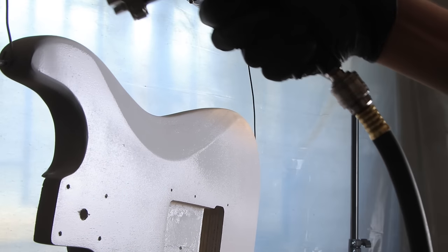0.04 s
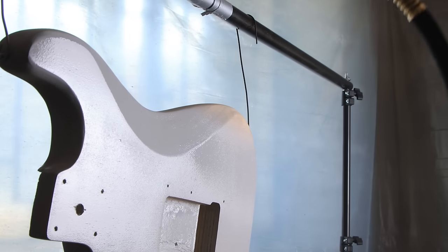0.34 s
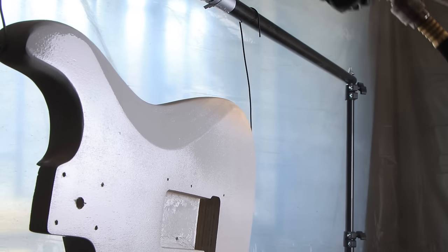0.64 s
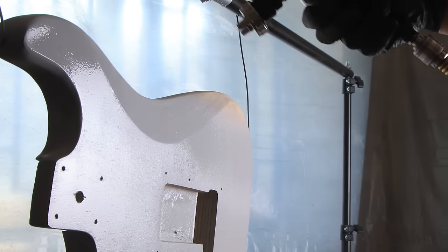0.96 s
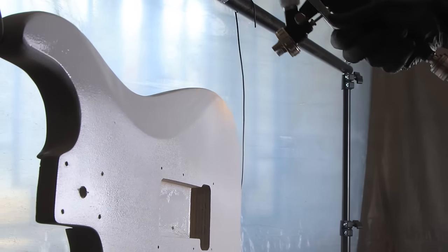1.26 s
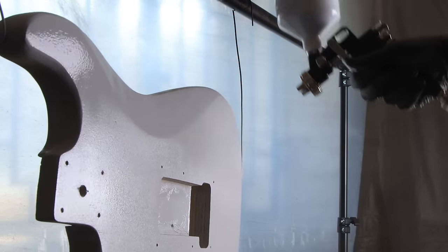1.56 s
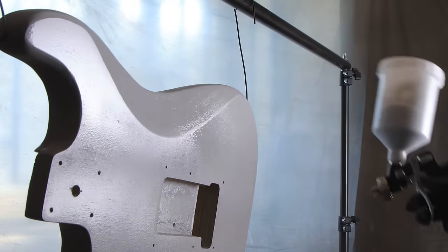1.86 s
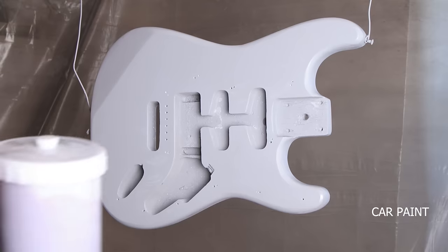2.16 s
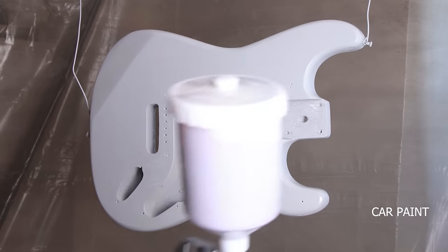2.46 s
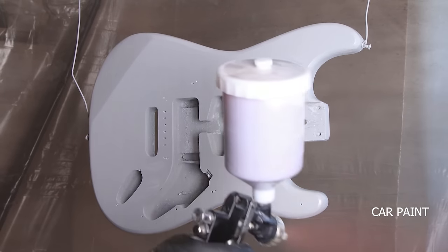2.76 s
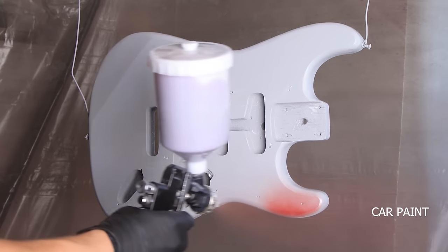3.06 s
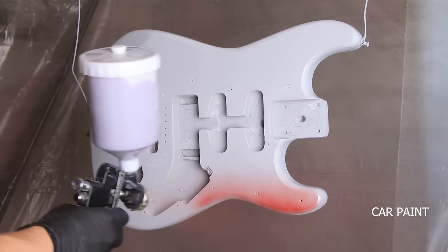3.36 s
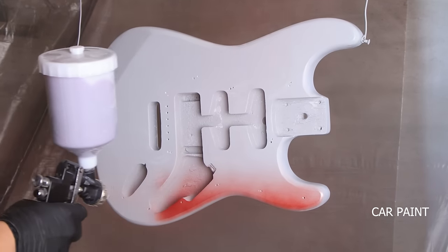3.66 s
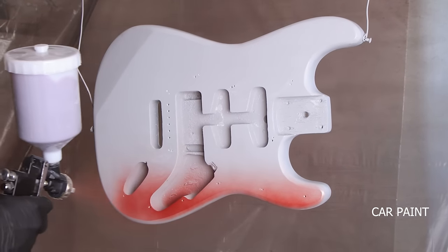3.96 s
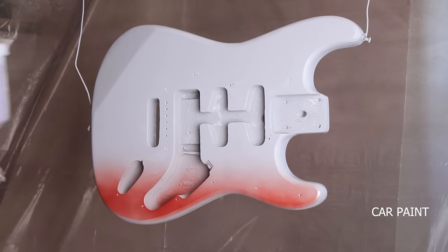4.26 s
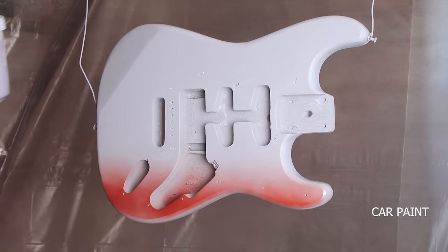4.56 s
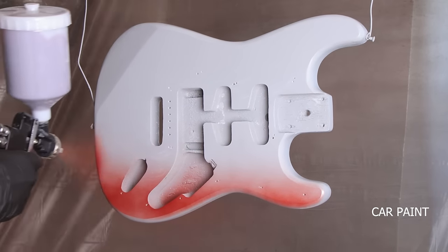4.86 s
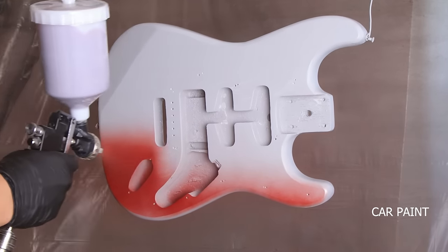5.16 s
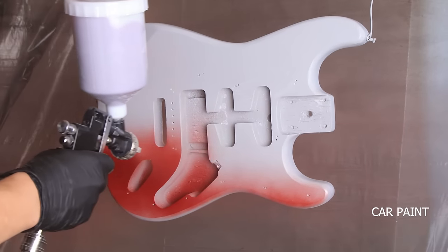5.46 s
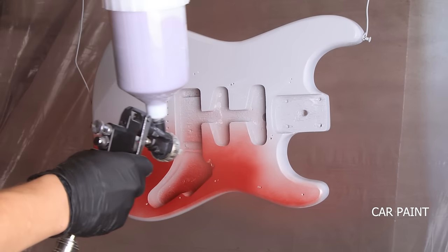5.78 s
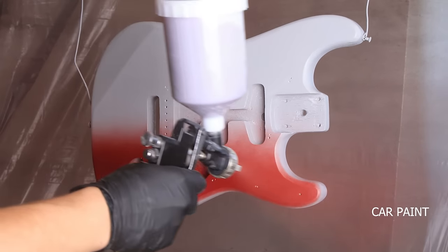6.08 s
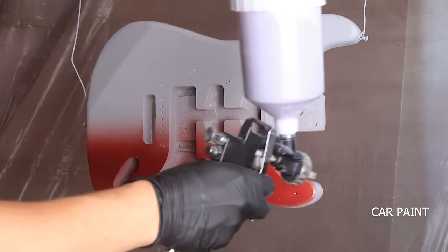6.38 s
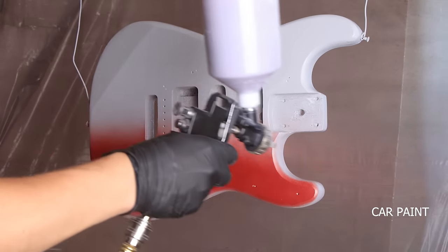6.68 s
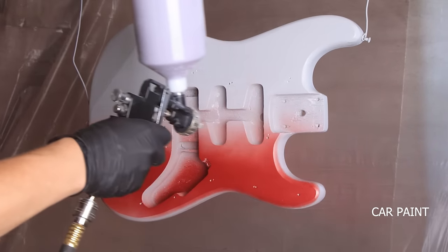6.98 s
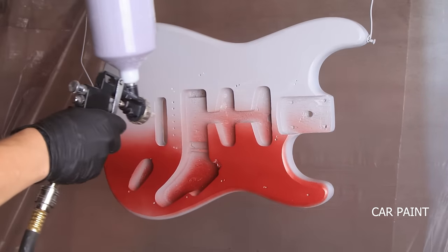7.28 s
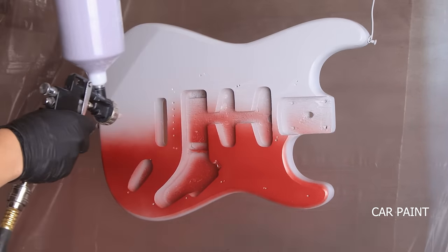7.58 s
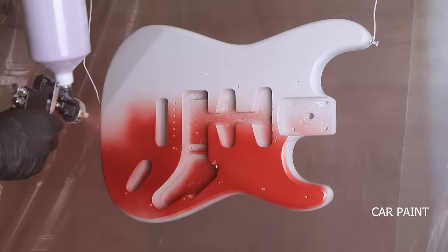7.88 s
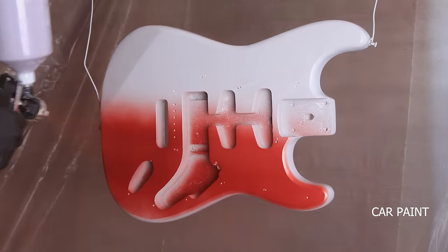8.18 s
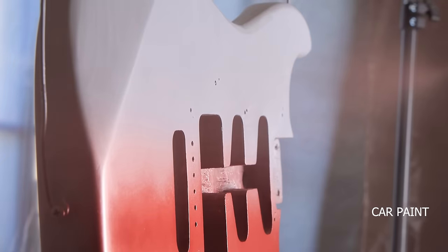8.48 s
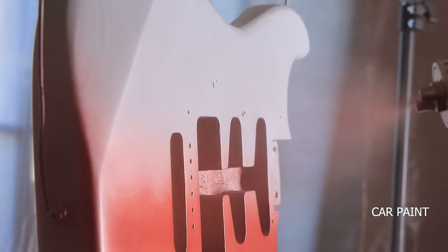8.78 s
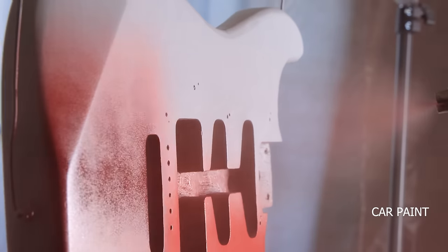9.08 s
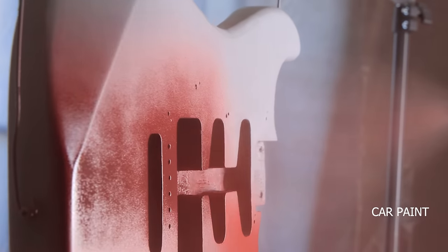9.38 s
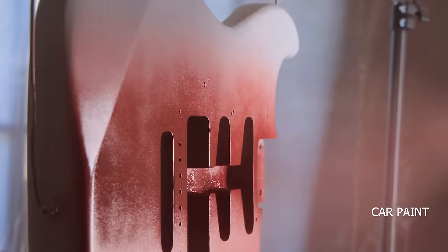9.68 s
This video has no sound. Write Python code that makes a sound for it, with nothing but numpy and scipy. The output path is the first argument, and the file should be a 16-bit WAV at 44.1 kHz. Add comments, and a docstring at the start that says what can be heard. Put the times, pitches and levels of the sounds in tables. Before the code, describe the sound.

A compressed-air spray gun paints a hanging wooden guitar body in a spray booth. A brief bright hiss with two small ticks of spat paint is followed by five longer hissing passes, each lasting one to two seconds. Under the hiss, air splashes softly on the wood and raises a weak hollow rumble. The short pauses hold only a faint air leak and extractor hum. The gun sounds close.

```python
"""A bright jet hiss starts, with two ticks of spat paint: a compressed-air spray gun coats a hanging
guitar body in six passes. The hiss is turbulent mixing noise; bursts fade fast, the fifth stops dead.
The fan of air splashes where it meets the wood, and buffets edges and cavities into a hollow rumble.
Between the passes only a faint leak of air and the spray booth's extractor remain."""
import sys
import numpy as np
from scipy import signal
from scipy.fft import irfft, next_fast_len
from scipy.io import wavfile
from scipy.ndimage import uniform_filter1d

SR = 44100
rng = np.random.default_rng(int(sys.argv[2]) if len(sys.argv) > 2 else 0)


def store_wav(level_fs):
    """Save 16-bit WAV to argv[1]."""
    pcm = np.round(np.clip(np.atleast_2d(level_fs), -1, 1) * 32767)
    wavfile.write(sys.argv[1], SR, pcm.T.astype(np.int16))


N = 438354
T = np.arange(N) / SR
SIZE, HOP = 1024, 256  # samples in a frame, and between frames
FRAME_S = np.arange(N // HOP + 5) * HOP / SR
NOW = FRAME_S[:, None]
HZ = np.fft.rfftfreq(SIZE, 1 / SR)
FINE_HZ = np.arange(0, 2000, SR / next_fast_len(N))


def amp(db):
    """Amplitude ratio of a level in decibels."""
    return 10 ** (np.asarray(db) / 20)


def spectrum(points):
    """Magnitude from levels interpolated on a logarithmic frequency axis."""
    hz, db = np.transpose(points)
    return amp(np.interp(np.log(HZ + 1), np.log(hz + 1), db))


def bell(hz, width_hz, axis=HZ):
    """Resonance curve with the given half-power bandwidth."""
    return 1 / (1 + ((axis - hz) / (.78 * width_hz)) ** 2)


def unit(shape, lo=0, hi=SR):
    """Normalises a magnitude to unit power within a band."""
    band = (HZ >= lo) & (HZ <= hi)
    return shape / np.sqrt(np.sum(shape[..., band] ** 2, -1, keepdims=True) + 1e-20)


def gaussian(shape):
    """Complex Gaussian amplitudes of random phase."""
    return rng.standard_normal((*shape, 2)).view(complex)[..., 0]


def patches(frames, bins):
    """Random fluctuation of unit variance, correlated in time and frequency."""
    z = rng.standard_normal((len(FRAME_S), len(HZ)))
    z = uniform_filter1d(uniform_filter1d(z, frames, 0), bins, 1, mode="wrap")
    return z / z.std()


def noise(magnitude):
    """Turbulence with a given short-time spectrum, by overlap-add."""
    spectra = magnitude * gaussian((len(FRAME_S), len(HZ)))
    frames = irfft(spectra, SIZE) * signal.windows.hann(SIZE, sym=False) * SIZE / np.sqrt(6)
    overlap = SIZE // HOP
    return sum(np.pad(frames[k::overlap].ravel(), (k * HOP, SIZE))[SIZE // 2:][:N]
               for k in range(overlap))


def steady(shape):
    """Stationary noise of unit rms with a finely resolved spectrum."""
    x = irfft(gaussian(FINE_HZ.shape) * shape, next_fast_len(N))[:N]
    return x / x.std()


def swell(on_s, hold_s, db, rise_db_per_s, fall_db_per_s):
    """Power of a stream of air that grows, holds and decays exponentially within its pass."""
    rise_db = rise_db_per_s * np.maximum(on_s - NOW, 0)
    fall_db = fall_db_per_s * np.maximum(NOW - on_s - hold_s, 0)
    return amp(db - rise_db - fall_db) ** 2 * (pass_at(NOW) == pass_at(on_s))


def blend(powers, values):
    """Power-weighted mean: the strongest stream dominates."""
    return sum(power * value for power, value in zip(powers, values)) / sum(powers)


# Spectrum of the extractor's air: f/Hz, relative level/dB
FAN_AIR = [(20, -10), (45, -5), (80, 0), (100, -4.5), (125, 1.5), (190, -1), (350, -7.5), (560, -5.5),
           (750, -9.5), (1300, -8.5), (2000, -16), (6000, -14.5), (12000, -17.5), (14000, -32.5)]
# Extractor tones: f/Hz, bandwidth/Hz, level/dB
FAN_TONES = [(73.8, 6.9, -99), (510, 5.9, -94.5), (1457, 70, -107)]

def extractor(air_db=-87, draught_db=-101, draught_hz=90):
    """Fan noise: narrow-band tones over broadband flow, with a draught in antiphase at the two ears."""
    tones = sum(amp(db) * steady(bell(hz, width, FINE_HZ)) for hz, width, db in FAN_TONES)
    draught = amp(draught_db) * steady(bell(0, draught_hz, FINE_HZ))
    air = noise(amp(air_db) * unit(spectrum(FAN_AIR)))
    return tones + air + np.array([draught, -draught])


# Spectrum of the closed gun's hiss: f/Hz, relative level/dB
LEAK_SPECTRUM = [(600, -9.5), (2000, -9.5), (4200, -4), (5000, 3.5), (5800, -4), (6900, 3), (8500, -8),
                 (9600, -1.5), (11000, -12), (11800, 1), (12500, -4), (13200, -18), (15800, -8)]
# Leaks between passes: start t/s, end t/s, initial level/dB before gain
LEAKS = [(0.197, 0.53, -70), (1.756, 2.081, -66), (4.25, 4.56, -87), (6.23, 6.54, -88)]

def leak(gain_db=2, fall_db_per_s=54, whistle_hz=11850, whistle_width_hz=600, whistle_db=-89):
    """Orifice noise from the closed gun decays exponentially; while near, the gun whistles faintly."""
    envelope = sum(((NOW > start) & (NOW < end)) * amp(db - fall_db_per_s * abs(NOW - start))
                   for start, end, db in LEAKS)
    hiss = unit(spectrum(LEAK_SPECTRUM)) * envelope * amp(gain_db)
    near = (NOW > 3) & (NOW < 7)
    whistle = near * amp(whistle_db) * unit(bell(whistle_hz, whistle_width_hz))
    return noise(np.hypot(hiss, whistle))


# Stray puffs of air: t/s, level/dB, half-length/s, corner f/Hz
PUFFS = [(4.92, -73, 0.066, 220), (8.85, -75, 0.028, 180)]

def puffs():
    """Wind noise: the pressure fluctuation of each puff thumps softly on the microphone."""
    out = np.zeros(N)
    for s, db, half_s, corner_hz in PUFFS:
        span = abs(T - s) < 3 * half_s
        window = np.exp(-((T[span] - s) / half_s) ** 2)
        band = (FINE_HZ / (FINE_HZ + corner_hz)) ** 2 / (1 + (FINE_HZ / corner_hz) ** 4)
        wind = window * steady(band)[span]
        out[span] += amp(db) * wind * np.linalg.norm(window) / np.linalg.norm(wind)
    return out


# Drops of paint spat by the nozzle: t/s, tick gain/dB, pop gain/dB
SPITS = [(0.055, -20, -38), (.094, -17, -36.5)]

def spits(tick_hz=9000, tick_s=.00015, travel_s=.024, push_s=.00023):
    """Sound outruns flow: each spit ticks, then its air arrives as a push and a weak suction."""
    out = 0
    for s, tick_db, pop_db in SPITS:
        tick = np.exp(-((T - s) / tick_s) ** 2) * np.sin(2 * np.pi * tick_hz * (T - s))
        age = np.maximum(T - s - travel_s, 0) / push_s
        pop = age * (2 - age * .8) * np.exp(-age)
        out = out + amp(tick_db) * tick + amp(pop_db) * pop
    return out


# Spectrum of the buffeting: f/Hz, relative level/dB
RUMBLE = [(30, -32), (160, -17), (245, -5.5), (265, -3.5), (350, -1), (435, -7), (455, -8), (690, -3),
          (730, -7.5), (880, -4.5), (930, -14), (1120, -12), (1800, -36)]
# Spectrum of the dull rush of the flow: f/Hz, relative level/dB
RUSH = [(40, -6.5), (100, -5), (130, 5), (170, 5), (400, -8), (900, 4.5), (1350, 15), (1800, 1.5),
        (4000, -12)]
# Cavity resonances: f/Hz, bandwidth/Hz, relative level/dB
CAVITY_MODES = [(198, 14, -15), (345, 29, -17), (411, 14, -11.5), (579.5, 29, -13), (616, 26, -9.5),
                (866, 30, -21.5)]
# Gusts on edges and cavities: fully on t/s, hold/s, drive level/dB, rise/(dB/s), fall/(dB/s),
# favoured f/Hz, loss away from it/(dB/octave)
GUSTS = [(0.07, 0.089, -54.5, 357.5, 206, 603, 6.5), (.87, .17, -49, 31.5, 25, 260, 3.5),
         (1.416, 0.19, -55.5, 39, 96.5, 420, 0.5), (3.017, 0.17, -59.5, 350, 35, 290, 12.5),
         (3.418, .05, -60.5, 80, 23, 340, 9), (4.91, 0.093, -63.5, 199, 34, 328, 2),
         (5.242, 0.032, -65.5, 60, 80, 450, 5), (6.985, 0.092, -56, 171, 130, 260, 10),
         (7.29, 0.03, -67, 150, 110, 600, 1.5), (7.705, 0.092, -47, 133, 113, 490, 3),
         (8.025, .02, -64.5, 130, 90, 600, 2), (8.19, 0.032, -68, 120, 113, 400, 1.5),
         (9.05, .005, -61, 450, 600, 400, 11), (9.137, 0.083, -58, 280, 170, 400, 7),
         (9.6, 0.12, -75.5, 12, 34, 420, 1)]

def buffet(stream_db=-79.5, onset_db=-75, hard_db=-56, brighten=.14, flutter_db=2, patchy_db=3,
           body_db=-10.5, cavity_db=-1, rush_db=-77, rush_onset_db=-81):
    """Forced resonance: gusts on edges and cavities rumble and excite hollow modes above a dull rush."""
    powers = [swell(*row[:5]) + 1e-20 for row in GUSTS]
    level_db = 10 * np.log10(sum(powers) + amp(stream_db) ** 2)
    favoured_hz, loss_db = (blend(powers, column) for column in np.transpose(GUSTS)[5:])
    # a weak stream only rushes; a strong one breaks into gusts
    gusts_db = flutter_db * patches(frames=5, bins=200)[:, :1]
    force = amp(level_db + gusts_db) / np.sqrt(1 + amp(onset_db - level_db) ** 4)
    flow = amp(rush_db) / np.sqrt(1 + amp(rush_onset_db - level_db) ** 2)

    def shedding(hz):
        """Vortex shedding favours one eddy size; harder gusts carry smaller eddies, which sound higher."""
        octaves_away = np.minimum(abs(np.log2((hz + 1) / favoured_hz)), 1.5)
        tilt_db = brighten * (level_db - hard_db) * np.log2(np.clip(hz / 400, .6, 2.5))
        return force * amp(tilt_db - loss_db * octaves_away)

    body = unit(spectrum(RUMBLE), 150, 750) * shedding(HZ)
    air = np.hypot(amp(body_db) * body, flow * unit(spectrum(RUSH)))
    ring = 0
    for hz, width, db in CAVITY_MODES:
        drive = np.interp(T, FRAME_S, shedding(hz)[:, 0])
        ring = ring + amp(db + cavity_db) * steady(bell(hz, width, FINE_HZ)) * drive
    flicker = amp(patchy_db * patches(frames=14, bins=3))
    return (noise(air * flicker) + ring) * bursts(lag_s=.0018, lead_s=.002)


# Spectrum of the air sheet on the wood: f/Hz, relative level/dB
SPLASH_SPECTRUM = [(1000, -4), (1500, -0.5), (1750, -1), (1900, 2.5), (2150, 4), (2400, -3), (3200, -12)]
# Sweeps of the fan of air onto the wood: fully on t/s, hold/s, level/dB, rise/(dB/s), fall/(dB/s),
# lower cutoff f/Hz when fully on
SWEEPS = [(.07, 0.1, -53.5, 112, 199, 1040), (.76, 0.74, -58, 42, 22, 1095),
          (2.477, 0.037, -61.5, 200, 121, 1150), (2.6, 0.38, -63, 30, 15, 1480),
          (2.72, 0.034, -58.5, 89, 80, 1120), (3.4, .15, -65, 15, 15, 1420),
          (4.79, 0.15, -62.5, 60, 27, 1110), (6.62, .04, -68, 100, 130, 1750),
          (7.1, 0.59, -67, 13, 11, 1340), (8.478, 0.055, -60.5, 46, 33, 1360),
          (8.946, 0.22, -63, 4, 22, 1280), (9.68, .05, -67, 30, 36, 1750)]

def splash(rim_db=-73.5, rim_cutoff_hz=1800, drop_hz_per_db=30, patchy_db=3):
    """A midrange splash of air, high-pass filtered: its steep low edge drops as it gets louder."""
    powers = [swell(*row[:5]) for row in SWEEPS]
    cutoffs = [hz + drop_hz_per_db * (db - 10 * np.log10(power + 1e-20))
               for power, (_, _, db, _, _, hz) in zip(powers, SWEEPS)]
    rim_power = np.full_like(NOW, amp(rim_db) ** 2)  # the rim of the fan always touches the wood
    level_db = 10 * np.log10(np.max(powers, 0) + rim_power)
    cutoff_hz = blend(np.square(powers + [rim_power]), cutoffs + [rim_cutoff_hz])
    high_pass = 1 / np.sqrt(1 + (np.clip(cutoff_hz, 1000, 1850) / (HZ + 1)) ** 40)
    shape = unit(spectrum(SPLASH_SPECTRUM) * high_pass, 1200, 2100)
    flicker_db = patchy_db * patches(frames=14, bins=3)
    return noise(shape * amp(level_db + flicker_db)) * bursts(lag_s=.0041, lead_s=.01)


# Bursts of spray, the fifth ending abruptly: start t/s, stop t/s, fade rate/(dB/s), pressure surge/dB,
# hiss level/dB before gain, roar level/dB
PASSES = [(-.05, 0.188, 364.5, 1.5, -31, -43), (0.52, 1.743, 349, 1, -29.6, -42.5),
          (2.423, 4.24, 380, 3.9, -31, -44), (4.563, 6.227, 377.5, 3.8, -32, -43.5),
          (6.54, 8.284, 9002, 3.5, -32, -43.9), (8.35, 9.851, 361, 10, -34.5, -43.5)]

def bursts(lag_s=0, lead_s=0, rise_s=.037):
    """Smooth rise, exponential decay; the lower bands start slightly later and fade sooner than the hiss."""
    t, envelope = T[::32], 0
    for start, stop, fade_db_per_s, *_ in PASSES:
        rise = np.sin(np.pi / 2 * np.clip((t - start - lag_s) / rise_s, 0, 1)) ** 3
        envelope = envelope + rise * amp(-fade_db_per_s * np.maximum(t - stop + lead_s, 0))
    return np.interp(T, t, envelope)


def pass_at(s):
    """Index of the latest burst of spray, looking two frames ahead."""
    starts = [row[0] for row in PASSES]
    return np.maximum(np.searchsorted(starts, s + 2 * HOP / SR) - 1, 0)


# Spectrum of fine turbulence at the air cap: f/Hz, relative level/dB
HISS = [(2500, -43), (4500, -17.5), (6000, -7.5), (7000, -1), (7800, -1), (8600, -4.5), (9900, 0),
        (11000, 0), (11750, 1.1), (12300, 1.1), (13150, -3), (14300, 0), (15400, 3), (16000, 0)]
# Spectrum of larger eddies mixing with still air: f/Hz, relative level/dB
ROAR = [(1700, -39.5), (2120, -28.5), (2290, -8.5), (2900, -5.5), (3700, -1), (4900, 2.56), (5700, 2),
        (7000, 1), (10000, -27)]
# Bands that swell or dip as the gun swings: t/s, half-length/s, f/Hz, bandwidth/Hz, gain/dB
SWINGS = [(.08, 0.074, 7050, 1090, 3.5), (.6, .1, 6500, 2500, -2), (0.883, 0.17, 7200, 1100, 5),
          (0.86, .1, 15000, 3000, -2), (1.185, 0.12, 10500, 7000, 3), (1.5, .18, 6820, 1196, 6),
          (2.6, 0.33, 5060, 2500, 2), (3.6, .5, 7100, 1500, -1.5), (5.598, 0.38, 2600, 800, 2),
          (7.38, 0.16, 6240, 1500, 2), (8.15, 0.14, 3520, 2000, -2), (9.25, 0.42, 2400, 600, 4),
          (9.87, 0.067, 12000, 6000, 3.5)]

def jet(hiss_gain_db=-2, dip_db=-1.9, patchy_db=1.4, waver_db=.2, surge_s=.23):
    """Turbulent mixing: small eddies hiss, larger ones roar; passes start bright until pressure sags."""
    start, _, _, surge_db, hiss_db, roar_db = np.transpose(PASSES)[:, pass_at(NOW)]
    surge_db = surge_db * np.exp(-((NOW - start) / surge_s) ** 2)  # pressure stored in the hose
    swing_db = sum(db * np.exp(-((NOW - s) / half_s) ** 2) * bell(hz, width)
                   for s, half_s, hz, width, db in SWINGS)
    hiss = unit(spectrum(HISS) * amp(dip_db * bell(hz=6800, width_hz=1300)), 8000, 15800)
    hiss = hiss * amp(surge_db * bell(hz=15000, width_hz=9500))
    roar = unit(spectrum(ROAR), 2400, 5500)
    roar = roar * amp(waver_db * patches(frames=12, bins=200)[:, :1])
    drift = amp(swing_db + patchy_db * patches(frames=30, bins=5))  # reflections shift as the gun moves
    return (noise(hiss * drift * amp(hiss_db + hiss_gain_db)) * bursts()
            + noise(roar * drift * amp(roar_db)) * bursts(lag_s=.001, lead_s=.0036))


def scene():
    """Superposition of the sounds of gun, wood and booth."""
    return jet() + splash() + buffet() + puffs() + spits() + leak() + extractor()


def record(dry):
    """Band limiting by a steep linear-phase low-pass filter."""
    low_pass = signal.firwin(801, cutoff=15880, window=("kaiser", 8), fs=SR)
    return signal.oaconvolve(dry, low_pass[None], "same", axes=1)


dry = scene()
out = record(dry)
store_wav(out)
```